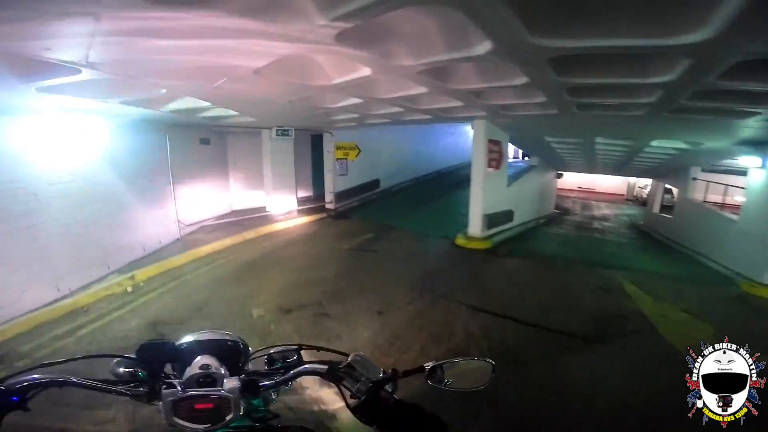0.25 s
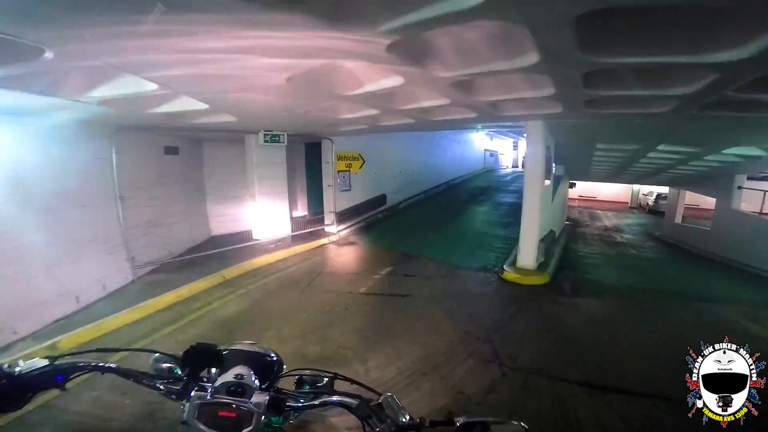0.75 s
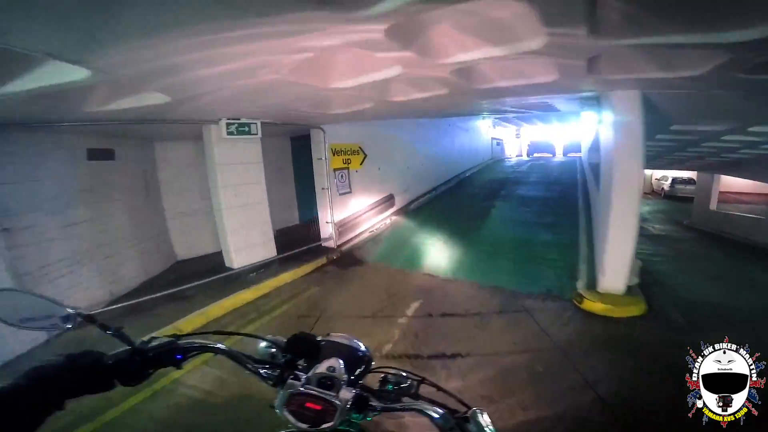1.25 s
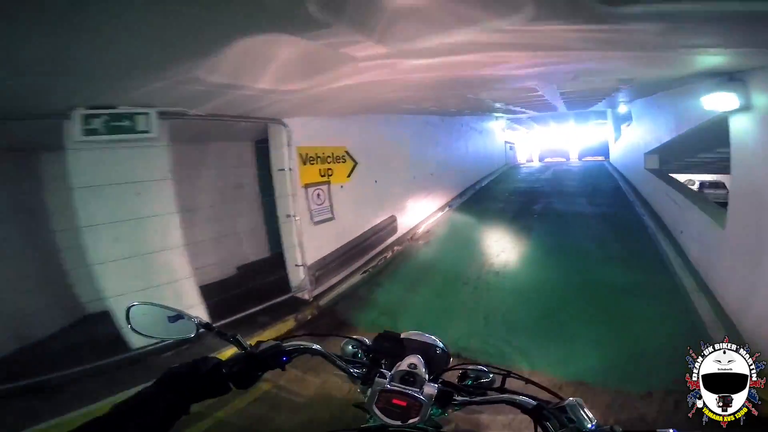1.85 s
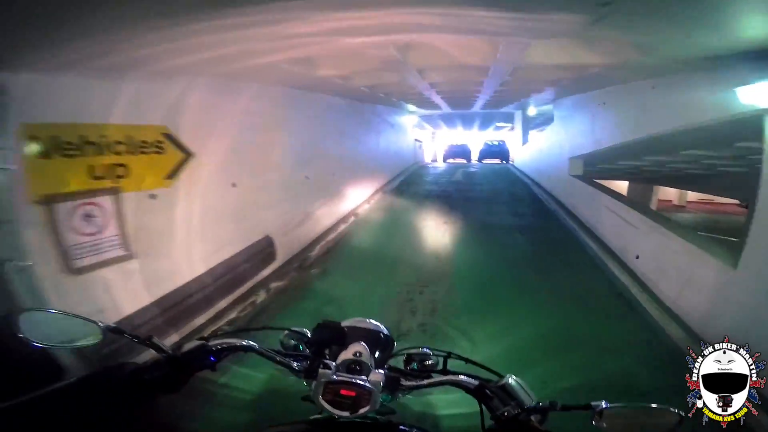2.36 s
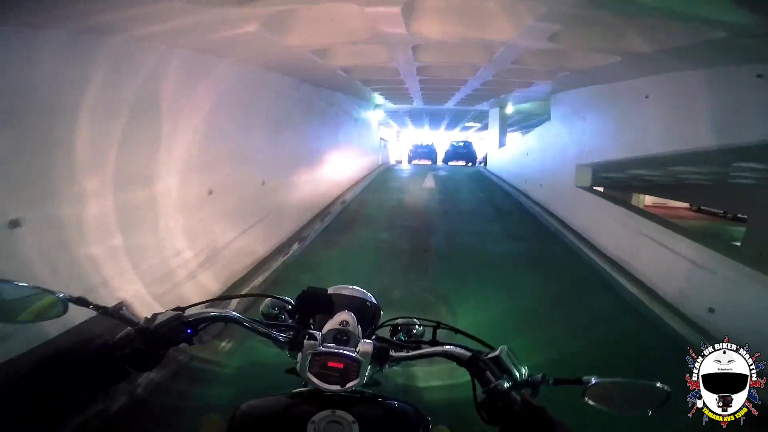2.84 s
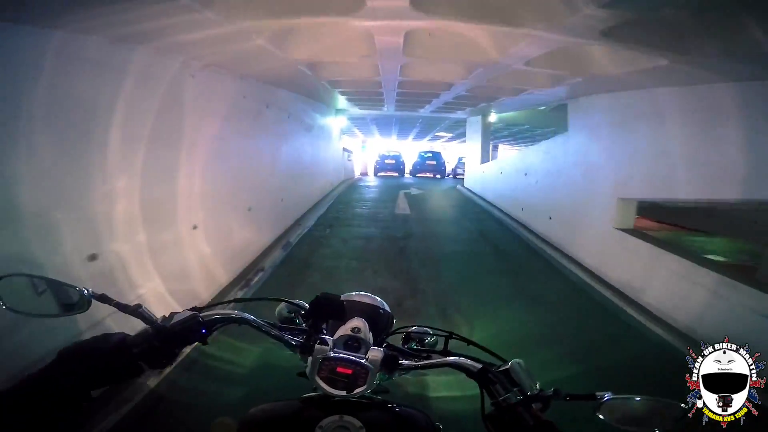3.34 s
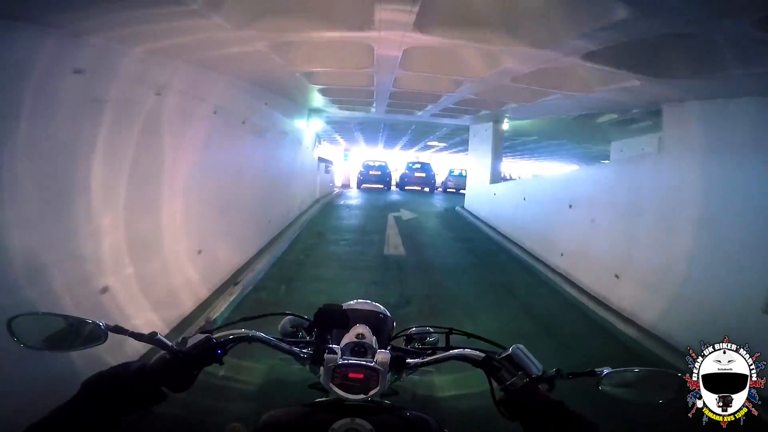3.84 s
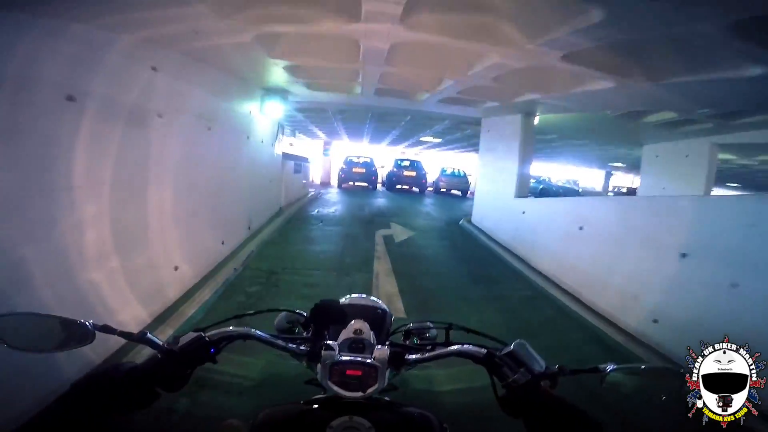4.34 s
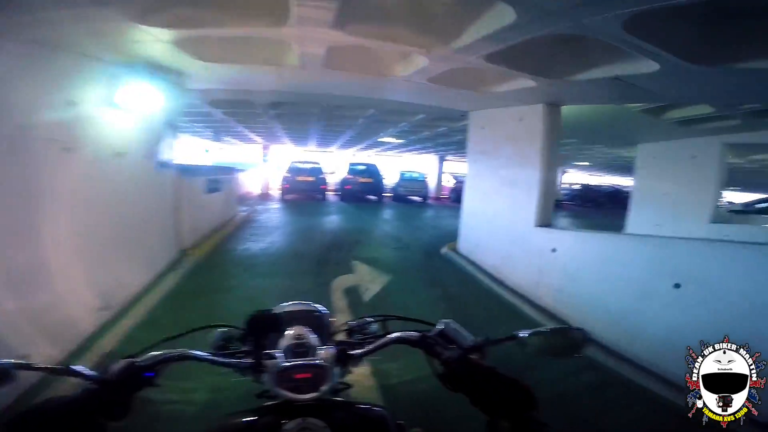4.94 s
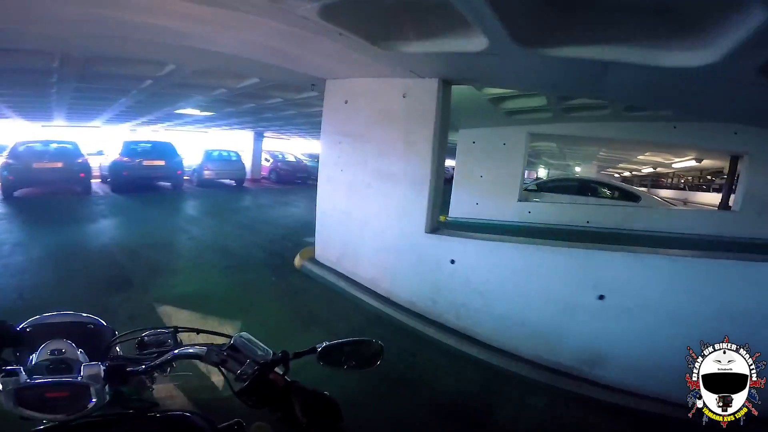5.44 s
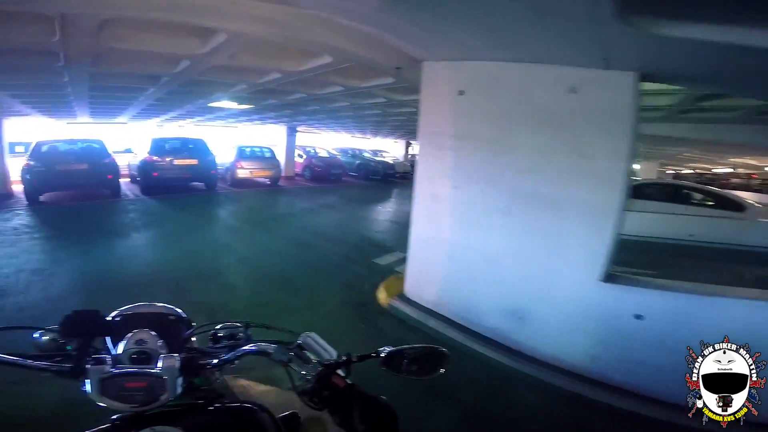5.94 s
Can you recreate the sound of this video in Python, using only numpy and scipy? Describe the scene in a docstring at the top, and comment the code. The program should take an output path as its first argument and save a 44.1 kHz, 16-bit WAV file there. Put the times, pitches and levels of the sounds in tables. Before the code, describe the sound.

Heard close from the rider's helmet, a V-twin motorcycle thumps unevenly at creeping speed inside a concrete car park. Two early throttle blips roar and crack, a steadier pull climbs the walled ramp, then a third blip and a weaker fourth bring more pops near the upper deck. Low resonances boom beneath gas rasp and faint mechanical hiss.

```python
"""A concrete car park: a V-twin motorcycle creeps over one floor and up a walled ramp to the next deck,
heard from the rider's helmet. Tones at multiples of the engine cycle make the exhaust note, and uneven
firing pairs ring the standing waves under the ceiling. Four throttle blips roar and spit harsh pops of
filtered noise. Gas rasp and a mechanical hiss throb with the firings; noise that dies away makes the
echo. A limiter holds down the peaks."""
import sys
import numpy as np
from scipy import signal
from scipy.fft import rfft, irfft
from scipy.io import wavfile
from scipy.ndimage import uniform_filter1d, minimum_filter1d

SR = 44100
rng = np.random.default_rng(int(sys.argv[2]) if len(sys.argv) > 2 else 0)


def to_wav(s):
    """Save 16-bit WAV."""
    ch = np.atleast_2d(s).T  # columns
    pcm = np.round(np.clip(ch, -1, 1) * 32767)  # PCM
    wavfile.write(sys.argv[1], SR, pcm.astype(np.int16))


N = 273155


def undb(db):
    """Turn decibels into a gain."""
    return 10 ** (np.asarray(db) / 20)


def level(x, db):
    """Scale a sound to a chosen rms (average) level."""
    return x * undb(db) / np.sqrt(np.mean(x ** 2))


def ring(x, modes):
    """Let a sound excite resonances (Hz, width Hz, dB), added with alternating sign."""
    out = 0
    for k, (hz, width_hz, db) in enumerate(modes):
        b, a = signal.iirpeak(hz, hz / width_hz, fs=SR)
        out = out + (-1) ** k * undb(db) * signal.lfilter(b, a, x)
    return out


def colour(x, points):
    """Filter a sound by a curve of (Hz, dB) points; pitches outside the curve are cut by 90 dB."""
    hz, db = np.transpose(points)
    f = np.maximum(np.fft.rfftfreq(len(x), 1 / SR), 1)
    gain_db = np.interp(np.log(f), np.log(hz), db, left=-90, right=-90)
    return irfft(rfft(x) * undb(gain_db), len(x))


def walk(rate):
    """Smooth random wandering: `rate` new random values per second, averaged twice."""
    k = int(SR / rate)
    steps = np.repeat(rng.standard_normal(N // k + 1), k)
    return uniform_filter1d(uniform_filter1d(steps, k), k)[:N]


def revs(t):
    """Engine cycles per second: each blip climbs from creeping speed to a peak, then falls steadily."""
    # engine speed while the clutch drags or the engine idles: (time [s], speed [cycles/s])
    creep_speed = [(0, 15), (.3, 15.1), (.52, 13.5), (.7, 11.5), (1.3, 11.5), (2.06, 12.6), (2.2, 13.7),
                   (2.5, 16.8), (2.68, 17.5), (2.8, 17), (3.12, 14.7), (3.45, 14.6), (3.7, 15.4),
                   (4.1, 16.7), (4.2, 16.5), (4.5, 10.8), (5.5, 10.6), (5.72, 9.6)]
    # throttle blips: (revs start to climb [s], revs peak [s], peak speed [cycles/s])
    throttle_blips = [(.52, .68, 21.6), (1.28, 1.53, 22), (4.2, 4.52, 24.5), (5.72, 5.94, 17)]
    fall_per_s = 18.5  # cycles per s lost each second once the throttle shuts
    creep = np.interp(t, *np.transpose(creep_speed))
    curves = [creep]
    for start_s, peak_s, top in throttle_blips:
        times = [start_s, peak_s, peak_s + top / fall_per_s]
        speeds = [np.interp(start_s, t, creep), top, 0]
        curves.append(np.interp(t, times, speeds, left=0))
    return uniform_filter1d(np.max(curves, axis=0), SR // 20)


def firings(hz):
    """Two uneven firings a cycle: a train of pulses, and a puff of gas that dies away after each."""
    rear_fires_at, rear_db = .4, -3  # share of the cycle after the front cylinder, strength
    timing_scatter, force_scatter_db = .02, 3.  # random spread: share of a cycle, dB
    cycles = np.cumsum(hz) / SR
    count = int(cycles[-1])
    chance = rng.standard_normal((count, 4))
    at = np.arange(count)[:, None] + [0, rear_fires_at] + timing_scatter * chance[:, :2]
    samples = np.interp(at, cycles, np.arange(N)).astype(int)
    force = undb([0, rear_db] + force_scatter_db * chance[:, 2:])
    pulses = np.zeros(N)
    np.add.at(pulses, samples, force)
    puff_s = 0.018  # time for a puff to fall to about a third
    puff = signal.lfilter([1], [1, -np.exp(-1 / (puff_s * SR))], pulses)
    return pulses, puff / np.mean(puff)


def exhaust(hz, thump_db, bark_db):
    """One tone per multiple of the cycle; each wanders as the bike moves among the reflections."""
    # the uneven firing favours some tones: (multiple of the cycle rate [-], level [dB])
    orders = [(2, -12), (3, -18), (4, -14), (5, 0), (6, -6), (7, -11), (8, -22), (9, -12), (10, -7),
              (11, -13), (12, -5), (13, 1), (14, -5), (15, -10), (16, -16), (17, -6), (18, -11), (19, -7),
              (20, -16), (21, -14), (22, -13), (23, -15), (24, -16), (25, -14), (26, -17), (27, -18),
              (28, -16), (29, -19), (30, -19), (31, -20), (32, -20)]
    # tailpipe colour: (frequency [Hz], level [dB])
    pipe_colour = [(25, -15.5), (50, -4), (62, -3.5), (75, 2), (95, 3), (118, -6.5), (145, -0.5), (195, 2),
                   (225, 1), (260, -4.5), (330, -3.5), (450, -10.5), (700, -20.5)]
    bark_from_hz, wander_db = 135, 2.
    angle, out = 2 * np.pi * np.cumsum(hz) / SR, 0
    # a sudden change of revs shakes out the deepest orders: here they are made louder
    revs_change = uniform_filter1d(np.gradient(hz) * SR, SR // 10)
    surge_db = np.minimum(0.5 * np.abs(revs_change), 8)
    pipe_hz, pipe_db = np.transpose(pipe_colour)
    for k, db in orders:
        barking = 1 / (1 + (bark_from_hz / (k * hz)) ** 12)  # 0 for deep tones, 1 for high ones
        pipe_gain_db = np.interp(np.log(k * hz), np.log(pipe_hz), pipe_db)
        gain_db = db + pipe_gain_db + barking * bark_db + wander_db * walk(4.01)
        phase = k * angle + 2 * np.pi * rng.random() + 0.4 * walk(5)
        out = out + undb(gain_db + (k < 4) * surge_db) * np.sin(phase)
    return out * undb(thump_db)


def standing_waves(pulses, ramp, deck, db):
    """The firings feed the fixed pitches of the space the bike is in; they ring on after revs change."""
    # standing waves in each space: (frequency [Hz], width [Hz], level [dB])
    floor_waves = [(75, 6, 2), (108, 6, -6), (150, 7, -4), (185, 9, -4), (213, 7, 0), (285, 14, -8)]
    ramp_waves = [(77, 6, -8), (150, 8, -12), (210, 12, -8), (270, 18, -12)]
    deck_waves = [(77, 5, 7), (95, 7, -2), (124, 3.5, 2), (150, 6, -1), (190, 8, 0), (218, 6, 2),
                  (280, 10, -7)]
    turbulence = .4  # gas noise against the firings

    def steep(x, waves):
        """Pass through each resonance twice, so that its sides are steeper."""
        return sum(ring(ring(x, [wave]), [(*wave[:2], 0)]) for wave in waves)

    pulses = pulses + turbulence * np.std(pulses) * rng.standard_normal(N)
    # pitches, how far inside the space the bike is, level over the thump in dB
    spaces = ((floor_waves, 1 - ramp, -4), (ramp_waves, ramp - deck, -3.5), (deck_waves, deck, 1))
    hum = 0
    for waves, inside, over_db in spaces:
        hum = hum + steep(undb(db + over_db) * pulses * inside, waves)
    return hum / np.std(steep(pulses, floor_waves))


def rasp(puff, rasp_db):
    """Turbulent gas leaving the pipe: noise that throbs with the firings."""
    # colour of the gas noise: (frequency [Hz], level per Hz [dB])
    rasp_colour = [(220, -5), (380, -2.5), (459, -11.5), (513, -8), (596, -13.5), (816, -12), (2500, -28),
                   (3250, -53), (5500, -120)]
    gas = (0.64 + puff) * rng.standard_normal(N)
    return undb(rasp_db) * level(colour(gas, rasp_colour), 0)


def gear(puff, db):
    """Valve gear, chain and tyres: a hiss that flickers and ticks faintly with the firings."""
    # colour of the hiss: (frequency [Hz], level per Hz [dB])
    gear_colour = [(590, -6), (1000, -4), (1510, -6.5), (1770, -10), (2360, -10), (3260, -12),
                   (9360, -18.5), (11900, -26.5), (15500, -50)]
    hiss = colour((7.0 + puff) * rng.standard_normal(N), gear_colour)
    flicker_db = 1.3 * walk(14)
    return level(hiss, 0) * undb(db + flicker_db)


def pops():
    """Blips roar; each pop is a crack and a rush of gas whose blow sets the silencer shell ringing."""
    # roar of gas in each blip: (time [s], length [s], level [dB], treble lift [dB])
    roars = [(0.519, 0.12, -24, 3.5), (1.378, 0.087, -22, 2), (4.314, 0.083, -19, -2.5),
             (5.797, 0.045, -22, 7.5)]
    # exhaust pops: (time [s], strength [dB], treble lift [dB], ring of the metal [dB])
    pop_list = [(.521, -9, -4, -16), (0.56, -9, -3, -16), (.583, -11.5, -3, -24), (.599, -13, 3, -9),
                (1.344, -13, -12, -15), (1.385, -14, -4, -13), (1.412, -21, -1, -6),
                (1.445, -10.5, -7, -10), (1.879, -9, -16, -20), (4.306, -10, -12, -14),
                (4.329, -14, -1, -15), (4.340, -12, 3, -15), (4.359, -13, -4, -20), (4.376, -11.5, 2, -18),
                (5.352, -15, -16, -20), (5.800, -9, -5, -7), (5.809, -9.5, 1, -2), (5.830, -15, -6, -2),
                (5.840, -11, 2, -5), (5.876, -20, 0, -4)]
    # colour of roars and pops: (frequency [Hz], level per Hz [dB])
    pop_colour = [(180, -24), (300, 6.5), (397, -1), (610, -8.5), (674, -11), (808, -9), (1370, -14.5),
                  (4720, -18.5), (11000, -26.5), (15500, -48)]
    # ringing of the silencer shell: (frequency [Hz], time to fall 60 dB [s], level [dB])
    silencer = [(830, .05, -8), (1320, .04, -8), (1800, .03, -9), (2250, .045, -4), (3250, .03, -11),
                (4400, .05, -6), (5500, .025, -11), (6600, .02, -12)]
    roar_swell_s, roar_start = 0.023, .5  # time to full strength, share reached after 2 ms
    roar_fade_s, pop_fade_s = 0.37, 0.13  # times to fall 60 dB
    rush, bright, blows = np.zeros((3, N))
    noise, t = rng.standard_normal(N), np.arange(SR // 2) / SR

    def add_burst(i, shape, lift_db):
        """Add shaped noise from sample i, and the extra share meant for its treble."""
        burst = shape[:N - i] * noise[i:i + len(t)]
        rush[i:i + len(t)] += burst
        bright[i:i + len(t)] += burst * (undb(lift_db) - 1)

    for s, length, db, lift_db in roars:
        swell = np.interp(t, [0, .002, roar_swell_s], [0, roar_start, 1])
        fade_db = -60 / roar_fade_s * np.maximum(t - length, 0)
        add_burst(int(s * SR), undb(db + fade_db) * swell, lift_db)
    for s, db, lift_db, ring_db in pop_list:
        gas = 0.33 * undb(-60 / pop_fade_s * t)
        crack = 0.31 * np.exp(-t / 0.0018)
        opening = np.minimum(t / .0012, 1)
        add_burst(int(s * SR), undb(db) * (gas + crack) * opening, lift_db)
        blows[int(s * SR)] = undb(db + ring_db)
    treble = signal.lfilter(*signal.butter(1, 3000, "high", fs=SR), bright)
    bursts = colour(rush + treble, pop_colour) / np.std(colour(noise, pop_colour))
    shell = sum(undb(db - 60 / t60 * t) * np.sin(2 * np.pi * hz * t) for hz, t60, db in silencer)
    return bursts + signal.fftconvolve(blows, shell)[:N]


def concrete_echo(column, onset_s=0.0067):
    """Diffuse concrete echo: noise that builds briefly and dies band by band; total energy 1."""
    # time to fall 60 dB: (frequency [Hz], time on the open floor [s], time on the ramp [s])
    echo_decay = np.array([(96, 4.7, 2.2), (385, 4.3, 2.08), (1500, 4.16, 0.99), (4220, 2.8, 1.44),
                           (8000, 1.08, 0.57), (12600, 0.11, 0.067)])
    size = 1 << 17
    t, out = np.arange(size) / SR, 0
    f = np.log(np.maximum(np.fft.rfftfreq(size, 1 / SR), 1))
    noise = rfft(rng.standard_normal(size))
    for k, t60 in enumerate(echo_decay[:, column]):
        share = np.interp(f, np.log(echo_decay[:, 0]), np.eye(len(echo_decay))[k])  # overlapping bands
        out = out + irfft(noise * share, size) * undb(-60 / max(t60, .1) * t)
    out = out * (1 - np.exp(-t / onset_s))
    return out / np.sqrt(np.sum(out ** 2))


def scene():
    """The bike close by, plus the echo of the floor, then of the ramp, which also serves the deck."""
    # exhaust: (time [s], level of the deep thump [dB], level of the bark [dB])
    exhaust_levels = [(0, -9, -10.5), (.38, -14, -20), (.48, -28, -17.5), (.55, -14, -14),
                      (1.08, -21.5, -19.5), (1.36, -15.5, -16), (1.53, -21, -15.5), (1.7, -17, -17.5),
                      (2.02, -18.5, -14), (2.28, -14.5, -13.5), (2.6, -15.5, -11.5), (3.7, -12.5, -14.5),
                      (3.95, -19, -10.5), (4.26, -12, -17.5), (4.45, -19, -12.5), (4.6, -12.5, -22.5),
                      (5.5, -18, -11.5), (5.8, -14.5, -18), (5.95, -17.5, -15.5), (6.19, -15.5, -20)]
    # at creeping revs: (time [s], level of the gas rasp [dB], level of the gear hiss [dB])
    hiss_levels = [(0, -29, -33.5), (.4, -33, -38.5), (.9, -31, -35), (1.75, -30, -34), (2.3, -34, -35),
                   (2.65, -29, -35.5), (3.2, -30.5, -34.5), (3.55, -30.5, -32.5), (3.9, -32, -36),
                   (4.65, -31, -35), (5, -35, -37.5), (5.4, -34, -34), (5.72, -35, -37), (6.19, -33, -33)]
    # echo, a row for the floor and one for the ramp: (level of the rasp [dB], level of the pops [dB])
    echo_levels = [(-6.5, -2), (-4.5, -8)]
    engine_echo_db = (-8, -14)  # on the floor, on the ramp
    enter_ramp_s, reach_deck_s, enter_takes_s = 2.1, 3.85, .3
    creep_hz = 15  # engine cycles per s at walking pace
    rasp_db_per_octave, gear_db_per_octave = 3, 2  # rise with revs
    t = np.arange(N) / SR
    s, *columns = np.transpose(exhaust_levels)
    thump_db, bark_db = (np.interp(t, s, c) for c in columns)
    s, *columns = np.transpose(hiss_levels)
    rasp_db, gear_db = (np.interp(t, s, c) for c in columns)
    hz = revs(t)
    octaves = np.log2(hz / creep_hz)
    ramp = np.clip((t - enter_ramp_s) / enter_takes_s, 0, 1)
    deck = np.clip((t - reach_deck_s) / enter_takes_s, 0, 1)
    pulses, puff = firings(hz)
    engine = exhaust(hz, thump_db, bark_db - thump_db)
    engine = engine + standing_waves(pulses, ramp, deck, thump_db)
    gas = rasp(puff, rasp_db + rasp_db_per_octave * octaves)
    bike = np.array([engine, gas, pops()])
    out = bike.sum(axis=0) + gear(puff, gear_db + gear_db_per_octave * octaves)
    for column, inside, engine_db, rest_db in zip((1, 2), (1 - ramp, ramp), engine_echo_db, echo_levels):
        sent = inside * (undb([engine_db, *rest_db]) @ bike)
        out = out + signal.fftconvolve(sent, concrete_echo(column))[:N]
    return out[None]


def record(dry):
    """A fast limiter holds the peaks near full scale, their very tips clip, and the top is cut."""
    top_hz = 15600
    hold = SR // 200  # samples in 5 ms
    gain = minimum_filter1d(1 / np.maximum(np.abs(dry), 1), 2 * hold)
    gain = uniform_filter1d(gain, hold)
    # opens and closes without a click
    edges = np.minimum(np.minimum(np.arange(N), np.arange(N)[::-1]) / hold, 1)
    held = np.clip(1.06 * gain * dry, -.995, .995) * edges
    return signal.sosfilt(signal.ellip(8, .05, 70, top_hz, fs=SR, output="sos"), held)


dry = scene()
out = record(dry)
to_wav(out)
```